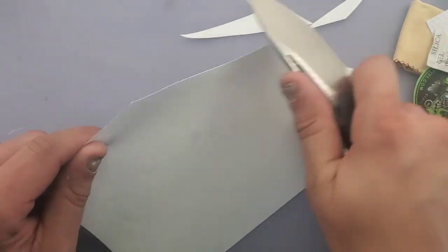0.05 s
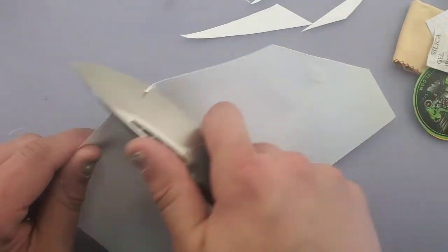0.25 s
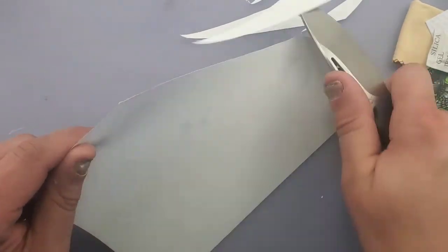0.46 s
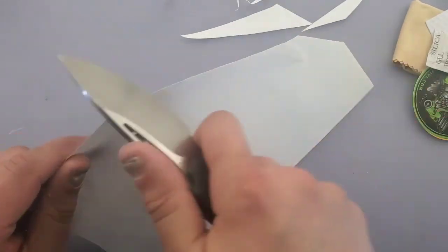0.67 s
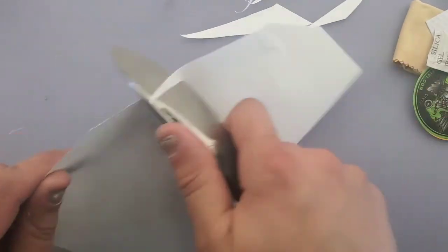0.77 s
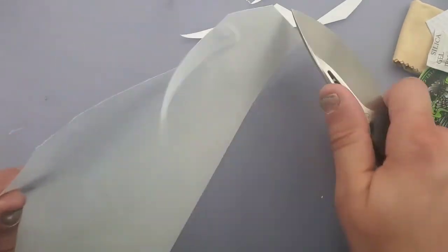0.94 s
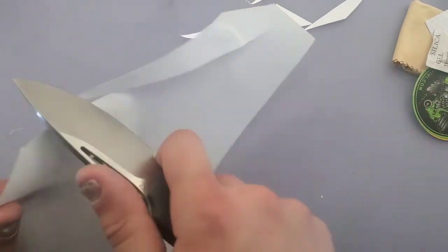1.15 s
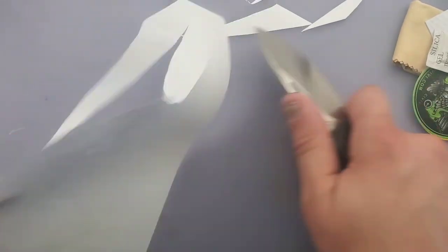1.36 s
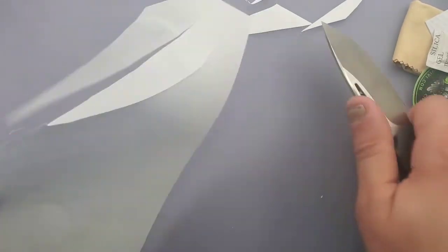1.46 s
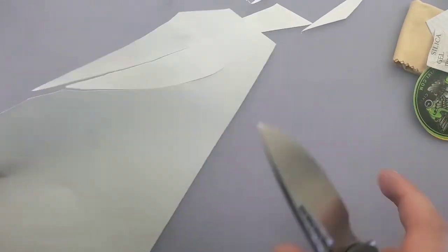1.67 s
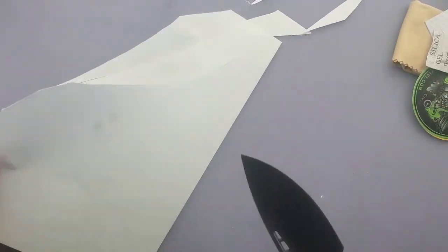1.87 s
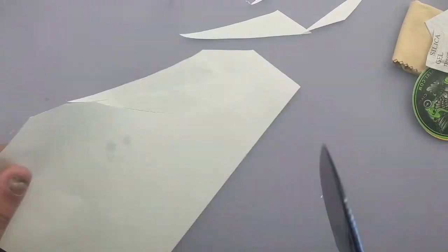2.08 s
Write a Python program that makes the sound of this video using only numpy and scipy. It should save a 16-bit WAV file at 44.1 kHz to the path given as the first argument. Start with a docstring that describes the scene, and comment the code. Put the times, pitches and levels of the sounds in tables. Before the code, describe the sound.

A knife slices strips from a hand-held paper sheet in four short, bright rasps with small snaps and pings, then the paper slides quietly on a mat; close stereo microphone, small quiet room.

```python
"""Four bright, rasping strokes are heard: a sharp knife slices strips off a hand-held sheet of paper.
Each stroke is thousands of tiny random snaps, shaped into a rasp, the sheet's ring and a dull flutter.
Short noise bursts make crackles and tugs as the edge catches; decaying tones make pops and pings.
Shaped snaps make the paper's rustle, the blade's light brush and, at the end, a slide onto the mat.
A stereo microphone is close by in a small room with a faint hum and a swelling low rumble."""
import sys
import numpy as np
from scipy import signal
from scipy.fft import rfft, irfft, next_fast_len
from scipy.io import wavfile
from scipy.ndimage import uniform_filter1d, map_coordinates

SR = 44100
rng = np.random.default_rng(int(sys.argv[2]) if len(sys.argv) > 2 else 0)


def digitize_waveform(pressure):
    """Quantize a signal to 16-bit integers and store it at the path in sys.argv[1].

    Rows of a 2-D input are taken as channels; values are limited to [-1, 1].
    """
    field = np.atleast_2d(pressure).T
    bounded = np.clip(field, -1, 1)
    quanta = np.round(bounded * 32767).astype(np.int16)
    wavfile.write(sys.argv[1], SR, quanta)


N = 93447

# Tone of the paper's dull flutter: (frequency [Hz], relative level [dB])
FLUTTER_TONE = [(40, -17.5), (120, -6), (200, -7), (290, -7), (370, -5), (430, -7), (525, 3), (680, -4.5),
                (900, -7), (1100, -2), (1500, -30.5), (3000, -54.5)]


def amp(db):
    """Turn decibels into a gain."""
    return 10 ** (np.asarray(db) / 20)


def along(points, hz):
    """Read a (frequency, value) table at any frequency, on a log axis."""
    f, v = np.transpose(points)
    return np.interp(np.log(hz + 1), np.log(f + 1), v)


def gains(rows):
    """Turn each level column into a gain per sample that fades to silence just beyond the table's ends."""
    edge_s = 0.0035  # length of each fade
    s, *columns = np.transpose(rows)
    t = np.arange(N) / SR
    time_inside = np.minimum(t - s[0], s[-1] - t)
    gate = np.clip(1 + time_inside / edge_s, 0, 1)
    return [gate * amp(np.interp(t, s, column)) for column in columns]


def wobble(rate):
    """A smooth random curve through `rate` random points a second."""
    knots = rng.standard_normal(int(N * rate / SR) + 4)
    return map_coordinates(knots, [np.arange(N) * rate / SR], order=2)


def noise_pair():
    """Two unrelated streams of steady noise."""
    return rng.standard_normal((2, N))


def filtered(x, response):
    """Change the strength and phase of each frequency in x by a response."""
    m = next_fast_len(N + SR // 2)  # spare room keeps the end from wrapping onto the start
    spectrum = rfft(x, m) * response(np.fft.rfftfreq(m, 1 / SR))
    return irfft(spectrum, m)[..., :N]


def colour(points):
    """The tone filter described by a (frequency [Hz], level [dB]) table."""
    return lambda hz: amp(along(points, hz))


def resonance(f, centre, width):
    """One resonance: strongest, with gain 1, at its centre."""
    return 1j * f * width / (centre ** 2 - f * f + 1j * f * width)


def radiate(pair, response, likeness=None):
    """Colour two unrelated signals and mix them to left and right; what both sides share has rms 1."""
    # How alike left and right usually are: (frequency [Hz], likeness [0 to 1])
    usual_likeness = [(60, 0.97), (250, 0.36), (550, 0.84), (1000, 0), (1350, 0.45), (2100, 0.37),
                      (2900, 0.0027), (11000, 0.044)]
    table = usual_likeness if likeness is None else likeness

    def mid_side_response(hz):
        turn = np.arccos(np.clip(along(table, hz), -.95, .95)) / 2
        return response(hz) * np.array([np.cos(turn), np.sin(turn)]) / np.cos(turn)

    mid, side = filtered(pair, mid_side_response)
    return np.array([mid + side, mid - side]) / np.std(mid)


def burst(start, t60):
    """A fast rise, then a fall of 60 dB in each t60 seconds."""
    attack_s = 0.00029  # time constant of the rise
    t = np.maximum(np.arange(N) / SR - start, 0)
    return (1 - np.exp(-t / attack_s)) * amp(-60 * t / t60)


def crack(centre, octaves):
    """Stereo noise gathered in one broad hump of frequencies."""
    def hump(hz):
        distance = np.log2((hz + 1) / centre) / octaves
        return (1 + distance ** 2 / 2) ** -2.0

    return radiate(noise_pair(), hump)


def ring(start, hz, t60):
    """One tone of the paper dying away, a little different at each side."""
    attack_s, side_share = .001, 0.51  # time constant of the rise; size of the left-right difference
    t = np.maximum(np.arange(N) / SR - start, 0)
    phase = 2 * np.pi * hz * t + 2 * np.pi * rng.random()
    side = side_share * rng.choice([-1, 1]) * np.cos(phase) * np.array([[1], [-1]])
    return (np.sin(phase) + side) * (1 - np.exp(-t / attack_s)) * amp(-60 * t / t60)


def fibres():
    """Uneven tiny snaps come in clumps; each reaches the two sides with its own strength and sign."""
    fibres_per_s, spread_db = 16000, 1.6  # average rate; average boost before the cap
    clump_db, clumps_per_s = .8, 220  # depth and rate of the random swells
    sizes = amp(spread_db * np.minimum(rng.exponential(size=N), 4))
    snaps = (rng.random(N) < fibres_per_s / SR) * sizes
    return snaps * amp(clump_db * wobble(clumps_per_s)) * rng.standard_normal((2, N))


def sheet(f):
    """The held sheet favours its broad resonances and radiates little below a low limit."""
    # Resonances of the held sheet: (frequency [Hz], width [Hz], relative level [dB])
    sheet_modes = [(1122, 145, -8), (1303, 86, -1), (1615, 440, -8.5), (1820, 95, 0), (2153, 400, -2.5),
                   (2470, 626, -4), (3004, 530, -6.5)]
    low_hz = 1010
    modes = 0
    for k, (centre, width, db) in enumerate(sheet_modes):
        modes = modes + (-1) ** k * amp(db) * resonance(f, centre, width)  # neighbours have opposite signs
    return modes * f ** 4 / np.sqrt(f ** 8 + low_hz ** 8)


def glances(pair, count):
    """Add faint copies off the hands and desk; their delays drift as the blade travels."""
    latest_s, copy_db = .004, -15  # longest delay before drift; level of each copy
    drift_s, drifts_per_s = .00004, 7.05  # depth and rate of the delay's drift
    n = np.arange(N)

    def delay():
        return SR * (rng.uniform(latest_s / 10, latest_s) + drift_s * wobble(drifts_per_s))

    def with_copies(x):
        copies = sum(np.interp(n - delay(), n, x, left=0) for _ in range(count))
        return x + amp(copy_db) * copies

    return np.array([with_copies(x) for x in pair])


def flexing(pair):
    """Bending paper favours shifting bands: random patches of frequency and time get louder or softer."""
    depth_db, bins, frames = 2, 4, 6  # typical change; patch width and life in spectrum steps
    z = signal.stft(pair, nperseg=512)[2]
    field = uniform_filter1d(rng.standard_normal(z.shape[1:]), bins, 0)
    field = uniform_filter1d(field, frames, 1)
    return signal.istft(z * amp(depth_db * field / field.std()), nperseg=512)[1][:, :N]


def cutting():
    """Breaking fibres rasp at the edge, ring the strip and the sheet, and make the sheet flutter."""
    # One table per stroke: (time [s], rasp level [dB], sheet drive before the body mix [dB])
    cut_1 = [(0, -20, -22), (0.024, -22, -24), (0.031, -32.5, -31), (0.06, -53.5, -51.5), (.1, -51.5, -49),
             (.13, -72, -84)]
    cut_2 = [(.332, -63, -52), (0.357, -41, -36), (.378, -33, -28.5), (0.391, -26, -30), (.44, -23, -29.5),
             (0.486, -22.5, -35), (0.541, -26, -33.5), (.552, -41, -48.5), (.6, -67, -53)]
    cut_3 = [(.813, -44, -35.5), (0.862, -24.5, -30), (.92, -22.5, -32.5), (.976, -25, -31),
             (1.027, -32, -33.5), (1.04, -44.5, -37), (1.07, -50, -41), (1.12, -99, -79)]
    cut_4 = [(1.3, -41, -37.5), (1.339, -22.5, -26), (1.375, -20, -30.5), (1.41, -24, -30),
             (1.479, -28.5, -31.5), (1.495, -41.5, -30.5), (1.55, -59.5, -54), (1.61, -75, -57)]
    # Ring of the free strip in each stroke: (frequency [Hz], width [Hz], level beside the rasp [dB])
    strip_modes = [(3256, 220, 0), (2097, 226, 6), (1990, 246, 3), (3620, 26, 0)]
    # Tone of the fibre rasp: (frequency [Hz], relative level [dB])
    rasp_tone = [(1000, -40), (1800, -17), (2500, -4), (3500, 0.5), (4500, -1), (5500, -2), (8000, -4),
                 (10400, -4), (11400, -11.5), (12500, -55.5)]
    ring_db, flutter_db = -3, -16  # the body mix
    body = amp(ring_db) * radiate(fibres(), sheet)
    body = body + amp(flutter_db) * radiate(fibres(), colour(FLUTTER_TONE))
    out = 0
    for cut, (centre, width, db) in zip([cut_1, cut_2, cut_3, cut_4], strip_modes):
        def edge_response(hz):
            return colour(rasp_tone)(hz) + amp(db) * resonance(hz, centre, width)

        edge_gain, body_gain = gains(cut)
        rasp = radiate(flexing(glances(fibres(), count=5)), edge_response)
        out = out + edge_gain * rasp + body_gain * body
    return out


def handling():
    """The sheet shifts in the fingers: light friction made of tiny snaps."""
    # Loudness of the rustle: (time [s], level [dB])
    held_level = [(0, -31), (.12, -63.5), (.155, -59.5), (.18, -78), (.2, -65.5), (.245, -60), (.3, -74.5),
                  (.58, -51), (.69, -73), (.745, -64), (.785, -52), (.81, -54), (1.1, -56.5),
                  (1.135, -66.5), (1.17, -60.5), (1.25, -68.5), (1.58, -52.5), (1.62, -71), (1.74, -71)]
    # Tone of the rustle: (frequency [Hz], relative level [dB])
    held_tone = [(100, -16.5), (250, -10), (520, -8.5), (800, -8.5), (1100, -4), (1900, 0), (3200, -3),
                 (5000, -11.5), (10000, -15), (12000, -23.5)]
    return gains(held_level)[0] * radiate(fibres(), colour(held_tone))


def room_hum():
    """The room's low hum is steady noise, strongest at low frequencies."""
    # Tone of the room's floor: (frequency [Hz], relative level [dB])
    hum_tone = [(20, -11), (40, -16), (60, 2), (90, -17), (150, -10.5), (250, -28), (600, -28), (3000, -38),
                (12000, -45.5)]
    return amp(-68) * radiate(noise_pair(), colour(hum_tone))


def sway_rumble():
    """A low rumble of noise swells as the hands move."""
    # Loudness of the rumble: (time [s], level [dB])
    sway_level = [(0, -61.5), (.2, -88.5), (.42, -64.5), (.65, -89.5), (.79, -60), (.9, -65), (1.06, -63.5),
                  (1.18, -78), (1.42, -55.5), (1.62, -70), (1.81, -85.5), (1.9, -73), (2.12, -64.5)]
    # Tone of the rumble: (frequency [Hz], relative level [dB])
    sway_tone = [(20, -17.5), (45, -7.5), (70, 0), (110, -4.5), (200, -11.5), (500, -50.5)]
    return gains(sway_level)[0] * radiate(noise_pair(), colour(sway_tone), [(60, .3)])


def tugs():
    """The taut sheet tugs at the hand: dull bursts of noise."""
    # Each tug: (time [s], level [dB], centre [Hz])
    tug_list = [(0.025, -40, 458), (0.076, -53, 452), (.356, -38.5, 544), (0.403, -49, 280),
                (0.451, -37.5, 448), (.813, -42, 405), (0.884, -35.5, 486), (1.275, -42, 450),
                (1.287, -33.5, 236), (1.342, -37.5, 444)]
    octaves, t60 = 0.45, 0.068  # width of the hump; time to fall 60 dB [s]
    return sum(amp(db) * burst(s, t60) * crack(centre, octaves) for s, db, centre in tug_list)


def catches():
    """Short crackles of noise where the edge catches or the sheet buckles."""
    # Each crackle: (time [s], level before the trim [dB], centre [Hz], width [octaves], 60 dB fall [s])
    snap_list = [(0.08, -40.5, 1520, 1, 0.033), (0.1363, -38.5, 3470, 0.74, 0.025),
                 (0.136, -41.5, 8200, 0.3, 0.046), (0.3545, -23.5, 1990, 0.57, 0.033),
                 (0.434, -24, 4220, 0.58, 0.022), (0.448, -15, 4240, 1, 0.035),
                 (0.812, -39, 2000, 0.92, 0.031), (0.956, -21.5, 1580, 0.33, 0.055),
                 (1.134, -47.5, 1630, 0.51, 0.038), (1.223, -50, 1290, 0.73, 0.04),
                 (1.274, -36.5, 1420, 1.12, 0.56), (1.2887, -23, 4960, 2.3, 0.049),
                 (1.378, -21, 3290, 0.71, 0.018), (1.477, -22, 2590, 1.15, 0.012),
                 (1.498, -23, 2190, 0.32, 0.027), (1.519, -31, 1312, 0.47, 0.039),
                 (1.8537, -30.5, 2000, 1.17, 0.014), (1.978, -49, 1200, 0.83, 0.069)]
    trim_db = -0.5
    out = 0
    for s, db, centre, width, t60 in snap_list:
        out = out + amp(db + trim_db) * burst(s, t60) * crack(centre, width)
    return out


def pings():
    """The free strip springs off the blade and pings, each time at its own pitch."""
    # Each ping: (time [s], level [dB], frequency [Hz], 60 dB fall [s])
    ping_list = [(.1365, -39, 4170, .034), (.148, -55, 2280, .05), (.432, -17, 2160, .02),
                 (.449, -21, 3510, 0.06), (.471, -33, 2310, .06), (.912, -14, 2178, 0.041),
                 (1.366, -23, 3710, .08)]
    return sum(amp(db) * ring(s, hz, t60) for s, db, hz, t60 in ping_list)


def brush():
    """The blade brushes the sheet on its way back: light friction made of tiny snaps."""
    # Loudness of the brush: (time [s], level [dB])
    brush_level = [(.606, -50.5), (.609, -38.5), (.617, -36.5), (.627, -43.5), (.634, -40), (.652, -48.5),
                   (.672, -76.5)]
    # Tone of the brush: (frequency [Hz], relative level [dB])
    brush_tone = [(290, -24.5), (500, -16), (754, -19), (1300, -12), (1480, -17), (2270, -4.5), (3800, -3),
                  (9740, -8), (11900, -21)]
    return gains(brush_level)[0] * radiate(fibres(), colour(brush_tone))


def loose_sheet():
    """The loose sheet sways and flutters dully after a stroke: noise with the flutter's tone."""
    # Loudness of the flutter: (time [s], level [dB])
    loose_level = [(1.02, -47), (1.07, -53), (1.1, -77), (1.14, -56), (1.19, -67.5), (1.225, -62.5),
                   (1.27, -64), (1.5, -40.5), (1.57, -66), (1.64, -71.5), (1.74, -73)]
    return gains(loose_level)[0] * radiate(noise_pair(), colour(FLUTTER_TONE))


def pops():
    """The whole sheet pops as it flexes, sounding all its tones at once."""
    # Each pop: (time [s], level before the tone's own level [dB], tilt [dB per octave])
    pop_list = [(1.2896, -20.5, 3.5), (1.8537, -31.5, -6.5)]
    # Tones of the flexed sheet: (frequency [Hz], level before tilt [dB], 60 dB fall [s])
    pop_tones = [(1274, -2.5, 0.027), (1792, 2, 0.022), (2270, -5, 0.027), (2500, -12, 0.03),
                 (2850, -6.5, .029)]
    lowest_hz = pop_tones[0][0]
    out = 0
    for s, db, tilt in pop_list:
        for hz, level, t60 in pop_tones:
            out = out + ring(s, hz, t60) * amp(db + level + tilt * np.log2(hz / lowest_hz))
    return out


def slide():
    """The sheet slides on the mat, crinkling in clumps; the left side hears it slightly later."""
    # Loudness before the crinkling: (time [s], level [dB])
    slide_level = [(1.744, -52), (1.8, -50.5), (1.85, -48), (1.89, -54), (1.915, -59.5), (1.935, -54.5),
                   (1.96, -53), (1.985, -50.5), (2.005, -51.5), (2.03, -49), (2.085, -57.5), (2.105, -54.5),
                   (2.119, -50.5)]
    # Tone of the slide: (frequency [Hz], relative level [dB])
    slide_tone = [(88, -36), (150, -5), (208, -7.5), (295, -16), (602, -3), (952, -7.5), (1320, 1.5),
                  (1480, -2), (1810, -0.5), (2850, 0), (3960, -7), (10300, -12.5), (11900, -23.5)]
    crinkle_db, crinkles_per_s = 1.3, 120  # depth and rate of the random swells
    lag_s = 0.000086  # left behind right
    level = gains(slide_level)[0] * amp(crinkle_db * wobble(crinkles_per_s))
    likeness = [(200, 0.99), (2000, 0.2), (8000, .15)]
    sound = level * radiate(flexing(fibres()), colour(slide_tone), likeness)
    # half the lag delays the left, half advances the right
    return filtered(sound, lambda hz: np.exp(1j * np.pi * hz * lag_s * np.array([[-1], [1]])))


def room(x):
    """The room adds a short noise tail, different at each side, duller as it dies."""
    # How fast the room dies away: (frequency [Hz], 60 dB fall [s])
    room_fall = [(200, 0.27), (2000, 0.12), (10000, 0.085)]
    hz, t, z = signal.stft(rng.standard_normal((2, SR // 2)), SR, nperseg=256)
    fall = amp(-60 * t / along(room_fall, hz)[:, None])
    tail = signal.istft(z * fall, SR, nperseg=256)[1]
    return signal.fftconvolve(x, tail / np.linalg.norm(tail[0]), axes=1)[:, :N]


def scene():
    """The paper, mostly a little to the left, in a small quiet room."""
    # Balance of the paper: (frequency [Hz], left minus right [dB])
    balance = [(60, -6), (97, 0.5), (160, 1.5), (250, 7.5), (400, 1.5), (650, 4), (1050, 2.5), (1690, 4.5),
               (2730, 4), (4400, 4), (7090, 4), (11400, -1.5)]
    paper = cutting() + handling() + tugs() + catches() + pings()
    paper = paper + brush() + loose_sheet() + pops() + slide()
    # each side takes half of the difference
    paper = filtered(paper, lambda hz: amp(along(balance, hz) * np.array([[.5], [-.5]])))
    room_db = -13
    return paper + amp(room_db) * room(paper) + room_hum() + sway_rumble()


def record(dry):
    """The recorder keeps almost nothing above its band limit."""
    top_hz = 11650
    return filtered(dry, lambda hz: 1 / np.sqrt(1 + (hz / top_hz) ** 200))


dry = scene()
out = record(dry)
digitize_waveform(out)
```